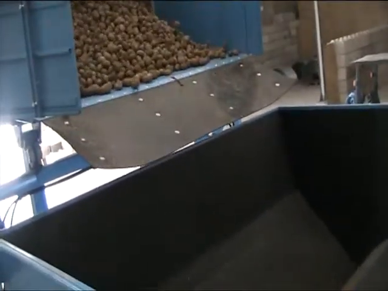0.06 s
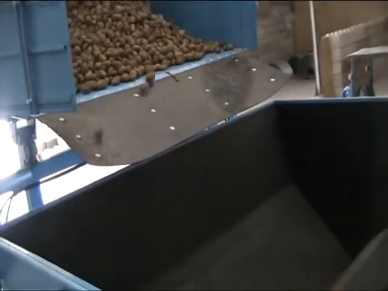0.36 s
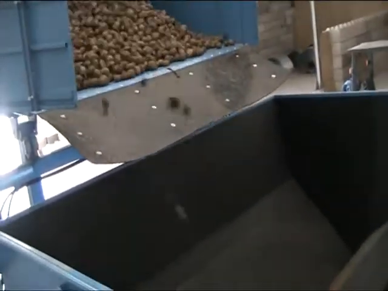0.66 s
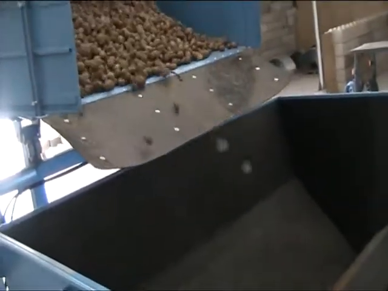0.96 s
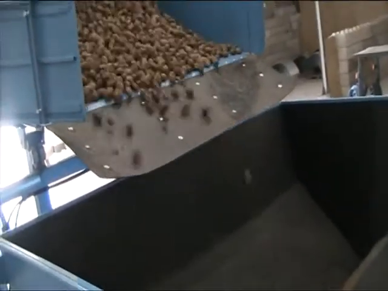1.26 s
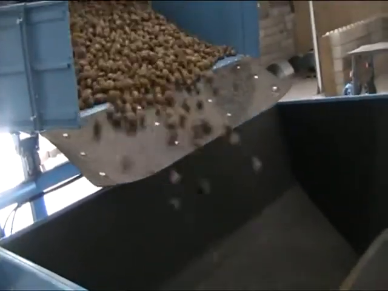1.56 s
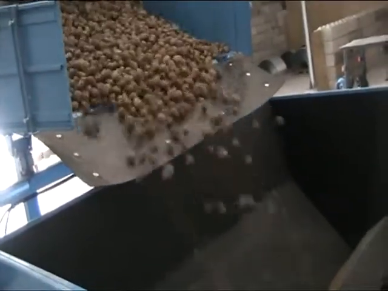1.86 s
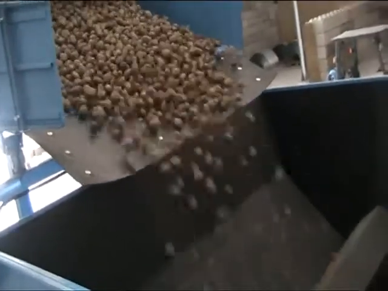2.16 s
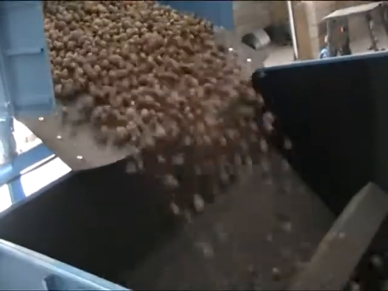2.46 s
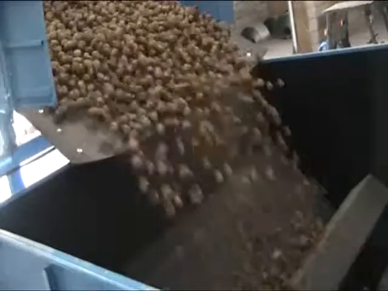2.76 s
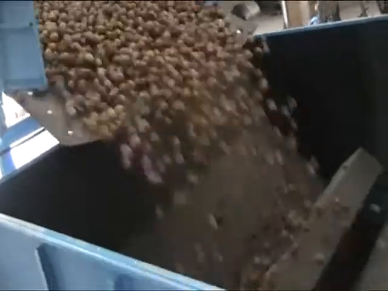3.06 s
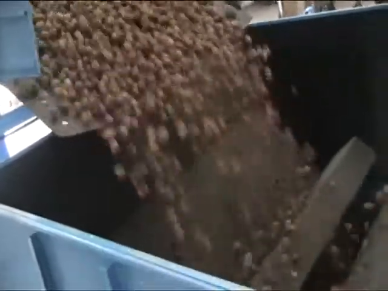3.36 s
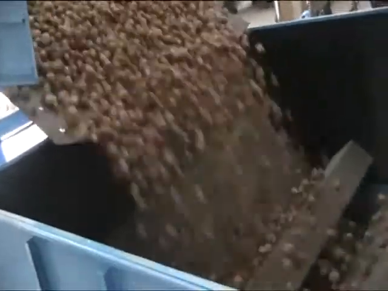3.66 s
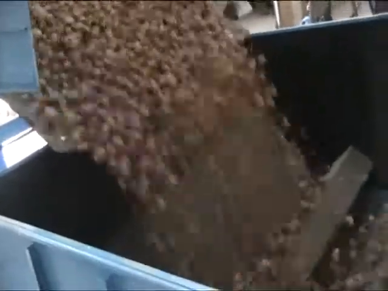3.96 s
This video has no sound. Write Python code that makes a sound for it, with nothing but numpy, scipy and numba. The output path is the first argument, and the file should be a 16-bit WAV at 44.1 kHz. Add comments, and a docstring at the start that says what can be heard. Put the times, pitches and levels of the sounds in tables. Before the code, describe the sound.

Potatoes knock, then drum down into a steel hopper over rumbling machinery.

```python
"""Potatoes pour from a tipping box over a chute into a steel hopper, in a hall of running machinery.
The box shudders and the load slides and rustles; single potatoes ping on the chute and knock on the
hopper walls, then from 2 s on they drum down in a stream. Soil sprays and stones click on the steel.
Motors rumble and hum and their drives whine. Knocks, pings, slaps and sliding echo in the hall,
and a gain control ducks the mix under the loudest blows."""
import sys
import numpy as np
from scipy import signal
from scipy.fft import rfft, irfft, next_fast_len
from scipy.io import wavfile
from scipy.ndimage import uniform_filter1d
from numba import njit

SR = 44100
rng = np.random.default_rng(int(sys.argv[2]) if len(sys.argv) > 2 else 0)


def transcribe(u):
    """Save the signal u as a 16-bit wav file named by the first command-line argument.

    u: samples, shape (n,) or (channels, n), limited to [-1, 1]; the rate is SR.
    q: integer samples, one column per channel.
    """
    v = np.clip(np.atleast_2d(u).T, -1, 1)
    q = np.round(v * 32767).astype(np.int16)
    wavfile.write(sys.argv[1], SR, q)


N = 176400


def undb(db):
    """Decibels to gain."""
    return 10 ** (np.asarray(db) / 20)


def unit(x):
    """Scale to rms 1."""
    return x / np.sqrt(np.mean(x ** 2) + 1e-18)


def curve(table, column=1):
    """One column of a time table as an automation curve, at every sample."""
    rows = np.array(table, float)
    return np.interp(np.arange(N) / SR, rows[:, 0], rows[:, column])


def colour(x, points, share=1):
    """Minimum-phase EQ through (frequency [Hz], gain [dB]) points; share scales the decibels."""
    hz, db = np.array(points, float).T
    size = next_fast_len(N + 8192, True)
    octave = np.log2(np.maximum(np.arange(size // 2 + 1) * SR / size, 1))
    gain = undb(share * np.interp(octave, np.log2(hz), db))
    cepstrum = irfft(np.log(gain), size)
    cepstrum[1:size // 2] *= 2  # folding the cepstrum makes the response causal
    cepstrum[size // 2 + 1:] = 0
    return irfft(rfft(x, size) * np.exp(rfft(cepstrum)), size)[..., :x.shape[-1]]


def fade(t60, size=SR // 2):
    """Exponential decay that falls 60 dB in t60 seconds."""
    return np.exp(-np.log(1000) * np.arange(size) / SR / max(t60, 1e-3))


def soft_attack(rise_s):
    """Half-second envelope that eases up to 1 with time constant rise_s."""
    return 1 - fade(rise_s * np.log(1000))


def ring(x, response):
    """Play a signal through an impulse response."""
    return signal.fftconvolve(np.atleast_2d(x), np.atleast_2d(response), axes=1)[:, :N]


def walk(per_s):
    """Smooth random modulation with rms 1, drawn per_s times a second."""
    hold = int(SR / per_s)
    steps = np.repeat(rng.standard_normal(N // hold + 1), hold)
    return unit(uniform_filter1d(uniform_filter1d(steps, hold), hold)[:N])


def grains(per_s, size):
    """Two channels of tiny clicks, random in time and strength."""
    return (rng.random(size) < per_s / SR) * rng.standard_normal((2, size))


def add(out, start_s, x):
    """Mix a sound in at its cue."""
    i = int(start_s * SR)
    out[..., i:i + x.shape[-1]] += x[..., :N - i]


def hall(x, wet_db=2, t60=1, predelay_s=.012):
    """Direct sound plus the diffuse tail of the hall."""
    tail = rng.standard_normal((2, SR)) * fade(t60, size=SR) * (np.arange(SR) > predelay_s * SR)
    return x + undb(wet_db) * ring(x, tail / np.sqrt(np.sum(tail ** 2) / 2))


# EQ of the machine rumble and of the hiss above it (frequency [Hz], gain [dB])
RUMBLE_EQ = [(24, -44), (37, -40), (50, -24), (72, -15), (91, -0.5), (116, -7), (165, -1), (215, -2.5),
             (270, -7), (380, -10.5), (540, -15), (750, -21), (1100, -29), (2000, -69.5)]
HISS_EQ = [(530, -20), (900, -4.5), (1400, -0.5), (1900, -5), (2120, -5.5), (4040, -14.5), (5050, -14),
           (9000, -20.5), (9950, -17.5), (12800, -102)]
# faders of the machine bed (time [s], rumble level [dB], hiss level [dB])
MACHINE_LEVELS = [(0, -14, -30.5), (.3, -15, -32.5), (.9, -16.5, -32.5), (1.45, -12.5, -32),
                  (1.65, -17, -35), (1.83, -14, -32.5), (2.05, -13, -33.5), (2.45, -17.5, -40.5),
                  (3.4, -20, -39.5), (4, -15, -43)]

def machinery():
    """Uneven rumble of motors and belts, with a smooth hiss above it."""
    rumble_db = curve(MACHINE_LEVELS) + 1.2 * walk(35)
    hiss_db = curve(MACHINE_LEVELS, column=2) + .6 * walk(20)
    rumble = unit(colour(rng.standard_normal((2, N)), RUMBLE_EQ))
    hiss = unit(colour(rng.standard_normal((2, N)), HISS_EQ))
    return rumble * undb(rumble_db) + hiss * undb(hiss_db)


def tones(table, waver_db=1.8, waver_rad=.8):
    """Held sine tones that waver a little in level and phase."""
    t, out = np.arange(N) / SR, np.zeros((2, N))
    for hz, db in table:
        for channel in out:
            peak = np.sqrt(2) * undb(db + waver_db * walk(14))
            channel += peak * np.sin(2 * np.pi * hz * t + waver_rad * walk(35))
    return out


# partials of the motor hum and of the drive whine (frequency [Hz], relative level [dB])
HUM_PARTIALS = [(559, -34), (1011, -44), (3103.5, -51)]
WHINE_PARTIALS = [(9751, -54), (10017, -59), (10067, -61), (10283, -54)]

def hum_and_whine(hum_db=-2, sink_s=(1.95, 2.45), late_whine_db=-21.5):
    """The motors hum throughout; the high drive whine sinks once the stream is under way."""
    whine_db = np.interp(np.arange(N) / SR, sink_s, (0, late_whine_db))
    return undb(hum_db) * tones(HUM_PARTIALS) + undb(whine_db) * tones(WHINE_PARTIALS)


# fader of the box's deep shudder (time [s], level [dB])
SHUDDER_LEVELS = [(0, -43), (.18, -31), (.6, -42), (1.55, -45), (1.75, -31), (1.87, -27), (1.94, -43.5)]

def box_shudder(centre_hz=49):
    """The box frame shakes as it tips, most when the load starts to move: an octave of low noise."""
    edges_hz = [centre_hz / np.sqrt(2), centre_hz * np.sqrt(2)]
    band = signal.butter(2, edges_hz, "band", fs=SR, output="sos")
    return unit(signal.sosfilt(band, rng.standard_normal((2, N)))) * undb(curve(SHUDDER_LEVELS))


# fader of the load sliding in the box (time [s], level [dB])
SLIDE_LEVELS = [(0, -31), (.25, -34), (.42, -26.5), (.74, -33), (.77, -26.5), (.96, -21), (1.15, -23.5),
                (1.3, -22), (1.42, -28.5), (1.6, -28.5), (1.72, -23), (1.86, -30), (2.1, -23.5),
                (2.45, -73), (4, -29.5)]
# EQ of the scraping skins (frequency [Hz], gain [dB])
SLIDE_EQ = [(200, -7), (500, 7), (800, 0), (1400, -3.5), (2300, -7), (3500, -15), (5000, -21),
            (7000, -17.5), (9500, -26.5), (12500, -28)]

def sliding_load(flicker_db=1.3):
    """Gritty skins scrape along the box as dense tiny slips."""
    slips = grains(per_s=1300, size=N)
    level_db = curve(SLIDE_LEVELS) + flicker_db * walk(70)
    return unit(hall(colour(slips, SLIDE_EQ))) * undb(level_db)


# modes of the steel hopper walls (frequency [Hz], relative level [dB], t60 at damping 1 [s])
HOPPER_MODES = [(91.3, 4, 0.099), (102, -12.5, 0.38), (132.5, -16.5, 0.25), (160.3, 0, 0.23),
                (192.2, 4.5, 0.15), (221.1, -1.5, 0.24), (238.5, -1, 0.071), (282.4, 2, 0.18),
                (313.9, -1, 0.17), (388, -19, 0.033), (455.6, -15, 0.19), (573.8, -22.5, 0.41),
                (647, -14.5, 0.12)]

def wall_modes(damping=1):
    """The ring of each hopper mode, one row per mode; more damping shortens it."""
    t = np.arange(SR // 2) / SR
    return np.array([undb(db) * np.sin(2 * np.pi * hz * t) * fade(t60 / damping)
                     for hz, db, t60 in HOPPER_MODES])


def radiate(x, cut_hz):
    """Low cut: the walls radiate little of the deepest bass."""
    return signal.sosfilt(signal.butter(4, cut_hz, "high", fs=SR, output="sos"), x)


# the pour, from a trickle to a full stream (time [s], impact rate [1/s], level [dB])
POUR = [(0, 21, -24.5), (1.1, 40, -31), (1.7, 110, -29.5), (1.99, 270, -17), (2.08, 376, -10),
        (2.5, 394, -14.5), (3.2, 506, -13.5), (4, 600, -18)]
# EQ of wet skins slapping on steel and on each other (frequency [Hz], gain [dB])
SLAP_EQ = [(210, -33.5), (350, -4), (431, -4), (514, -9.5), (554, -6.5), (950, -14.5), (1800, -19.5),
           (4800, -34.5), (8670, -37.5), (12000, -108)]

def potato_stream(places=12, size_spread_db=3, slap_db=-12, surge_db=1.5):
    """Potatoes land at many places: each thuds in that place's mix of wall modes and slaps briefly."""
    modes, rate = wall_modes(), np.maximum(curve(POUR), 1)
    thuds, slaps = 0, 0
    for _ in range(places):
        landings = rng.random(N) < rate / places / SR
        hits = landings * undb(size_spread_db * np.clip(rng.standard_normal(N), -2, 2))
        thud = rng.standard_normal((2, len(modes))) @ modes
        slap = rng.standard_normal((2, SR // 8)) * fade(t60=.059, size=SR // 8)
        thuds += ring(hits, thud)
        slaps += ring(hits ** 1.22, slap)  # the slap grows faster with size than the thud
    even = 1 / np.sqrt(rate)  # keeps loudness independent of the impact rate
    thuds = unit(radiate(thuds * even, cut_hz=139))  # light, quick contacts hardly wake the lowest modes
    slaps = unit(hall(colour(slaps * even, SLAP_EQ)))
    slap_gain = undb(slap_db + surge_db * walk(40))
    return undb(curve(POUR, column=2)) * (thuds + slap_gain * slaps)


# cues for sprays of loose soil (time [s], relative level [dB])
SOIL_CUES = [(.135, -2), (2.235, -5), (2.355, -1), (2.555, -3), (2.62, -2), (2.656, 0), (2.84, 0.5),
             (3.445, -6)]
# EQ of grit on steel (frequency [Hz], gain [dB])
SOIL_EQ = [(600, 8.5), (2000, 2), (4200, -9.5), (8000, -12), (11000, -24.5)]

def soil_sprays(trim_db=-23, rise_s=.015):
    """Small bursts of loose grit spray over the steel."""
    out, rise = np.zeros((2, N)), np.arange(SR // 2) / SR / rise_s
    swell = rise * np.exp(1 - rise)
    for s, db in SOIL_CUES:
        grit = unit(grains(per_s=4000, size=SR // 2))
        add(out, s, undb(db + trim_db) * grit * swell)
    return colour(out, SOIL_EQ)


# cues for potatoes bouncing on the chute (time [s], relative level [dB])
PING_CUES = [(.137, -0.5), (.405, -8), (.862, -5), (0.938, 0.5), (2.0, -3)]
# modes of the thin chute plate (frequency [Hz], relative level [dB], t60 [s])
CHUTE_MODES = [(562, 2, 0.57), (601, -4, 0.33), (1090, -3, 0.14), (1380, -7, 0.11), (1560, -5, 0.07),
               (1740, -3.5, 0.17), (2110, -6, 0.067)]

def chute_pings(trim_db=-17.5, detune=.013):
    """Short rings of the chute plate, slightly detuned by the load lying on it."""
    out, t = np.zeros((2, N)), np.arange(SR // 2) / SR
    attack = soft_attack(rise_s=.0044)
    for s, db in PING_CUES:
        for hz, mode_db, t60 in CHUTE_MODES:
            detuned_hz = hz * (1 + detune * rng.standard_normal())
            phase = 2 * np.pi * (detuned_hz * t + rng.random((2, 1)))
            add(out, s, undb(trim_db + db + mode_db) * np.sin(phase) * fade(t60) * attack)
    return hall(out, wet_db=-12)


# cues for heavy blows on the hopper walls (time [s], relative level [dB], centre of the woken modes [Hz])
KNOCK_CUES = [(0.162, 3, 196), (.163, 4, 300), (.176, -3, 327), (.178, -7.5, 550), (.234, 2.5, 158),
              (.584, 4.5, 231), (.853, -10, 171), (1.214, -8, 193), (1.264, -6, 494), (1.267, -2, 300),
              (1.294, 1.5, 300), (1.333, -3.5, 320), (1.361, 2.5, 189), (1.49, -2, 107), (1.79, -2.5, 102),
              (1.835, 1, 123), (1.911, -2, 215), (1.996, -4.5, 646), (2.002, 5.5, 283), (2.017, 2, 184),
              (2.115, 2, 178), (2.184, 2, 300), (2.326, 6, 217), (2.669, 5, 207), (3.323, 0.5, 214),
              (3.508, -0.5, 212)]

def hopper_knocks(trim_db=-1.5, spread_octaves=.18):
    """Heavy potatoes hit the walls: each soft contact wakes the modes near its own centre frequency."""
    out, modes = np.zeros(N), wall_modes(damping=1.25)
    attack = soft_attack(rise_s=.0074)
    hz, mode_db, _ = np.array(HOPPER_MODES).T
    for s, db, centre_hz in KNOCK_CUES:
        weight = np.exp(-.5 * (np.log2(hz / centre_hz) / spread_octaves) ** 2)
        knock = weight @ modes / np.linalg.norm(weight * undb(mode_db))
        add(out, s, undb(db + trim_db) * attack * knock)
    mid_only = np.array([radiate(out, cut_hz=71), np.zeros(N)])
    return hall(mid_only, wet_db=-18.5)


# cues for stones hitting the steel (time [s], relative level [dB])
STONE_CUES = [(0.763, -6), (1.2525, -0.5), (1.2647, 5), (1.271, -5), (1.287, -5), (1.3305, 0), (1.9949, 0),
              (2.112, -7)]
# EQ of a stone click (frequency [Hz], gain [dB])
STONE_EQ = [(300, 5), (700, 3), (2000, 1), (4200, -4), (8000, -4.5), (10500, -10), (13000, -43)]

def stone_clicks(trim_db=-6.5, tail_db=-17.5):
    """Hard stones click on the steel: a snap of noise with a short bright tail."""
    out = np.zeros((2, N))
    envelope = fade(t60=.0026) + undb(tail_db) * fade(t60=.097)
    for s, db in STONE_CUES:
        add(out, s, undb(db + trim_db) * rng.standard_normal((2, SR // 2)) * envelope)
    return colour(out, STONE_EQ)


# stereo width, as EQ on the side channel (frequency [Hz], gain [dB])
SIDE_EQ = [(30, -9), (65, -12.5), (130, -16.5), (260, -20), (500, -19), (1000, -11.5), (2000, -9),
           (4000, -4), (8000, -4)]
# pan curve, scaled by each channel's share (frequency [Hz], gain at share 1 [dB])
PAN_EQ = [(60, -3), (250, -1.2), (1000, -1.5), (2000, -2.5), (4500, -1), (9000, -0.5)]

def scene():
    """All sources mixed as mid and side: narrow in the bass, wide in the treble, a little to the right."""
    load = hopper_knocks() + chute_pings() + potato_stream() + sliding_load()
    debris = stone_clicks() + soil_sprays()
    mid, side = load + debris + machinery() + box_shudder() + hum_and_whine()
    side = colour(side, SIDE_EQ)
    left = colour(mid + side, PAN_EQ, share=.82)
    right = colour(mid - side, PAN_EQ, share=-.46)
    return np.array([left, right])


@njit
def follow(rectified, start, attack_s, release_s):
    """Envelope follower with separate times for rising and falling."""
    out, level = np.empty(len(rectified)), start
    for i in range(len(rectified)):
        lag_s = attack_s if rectified[i] > level else release_s
        level += (rectified[i] - level) / (lag_s * SR)
        out[i] = level
    return out


def record(dry):
    """Gain control ducks everything under the knocks and the stream; peaks clip and the top is cut."""
    threshold, ratio, top_hz = float(undb(-8.5)), 2.4, 11600
    envelope = follow(np.abs(dry).mean(axis=0), threshold, attack_s=.022, release_s=.17)
    gain = np.minimum(threshold / envelope, 1) ** (1 - 1 / ratio)
    high_cut = signal.ellip(8, .2, 70, top_hz, fs=SR, output="sos")
    return signal.sosfilt(high_cut, np.clip(dry * gain, -1, 1))


dry = scene()
out = record(dry)
transcribe(out)
```